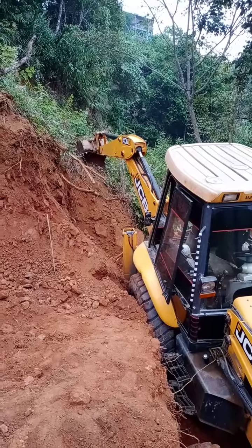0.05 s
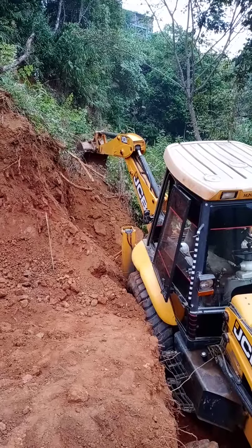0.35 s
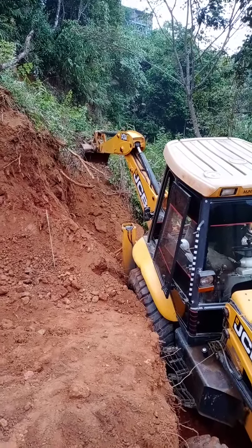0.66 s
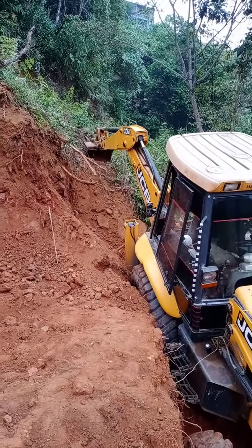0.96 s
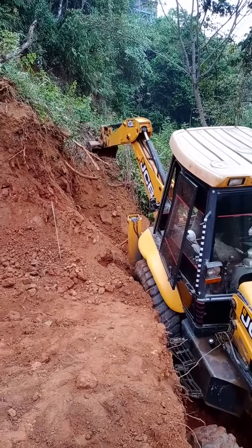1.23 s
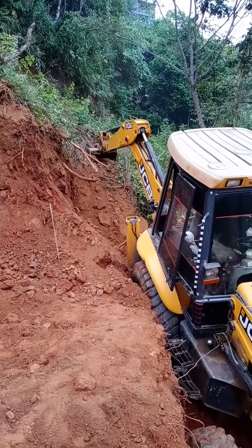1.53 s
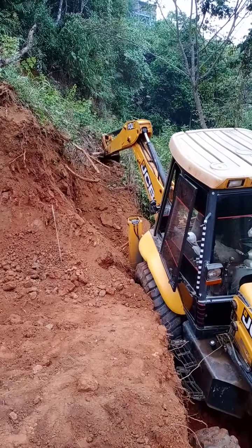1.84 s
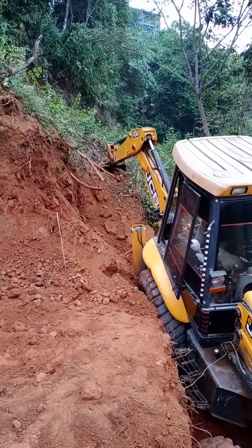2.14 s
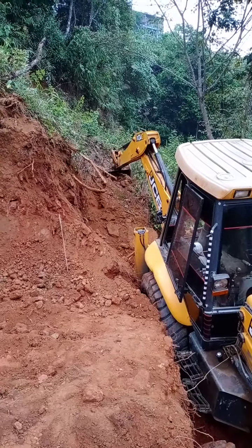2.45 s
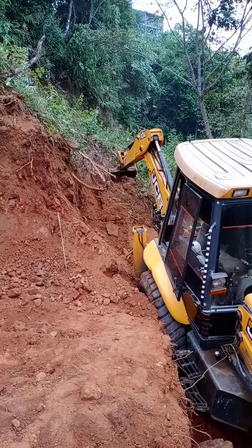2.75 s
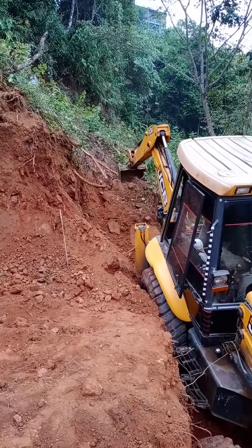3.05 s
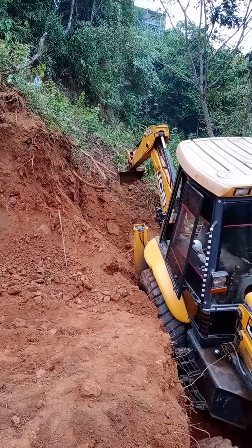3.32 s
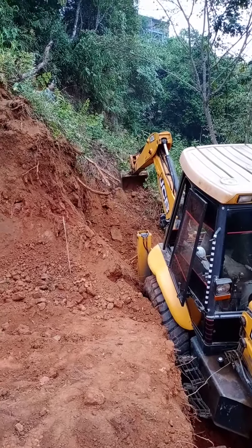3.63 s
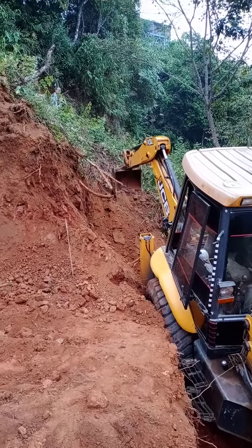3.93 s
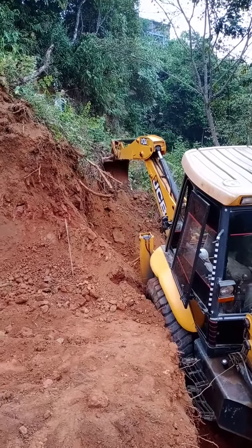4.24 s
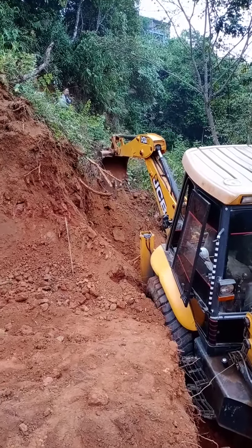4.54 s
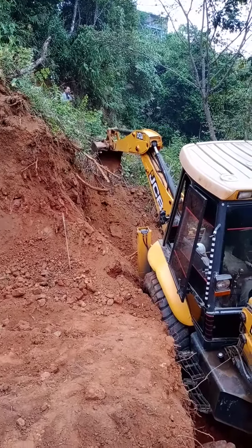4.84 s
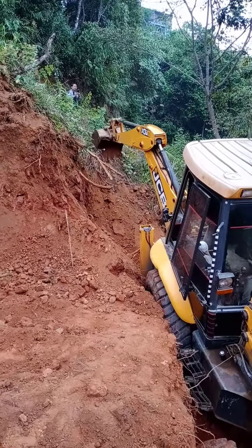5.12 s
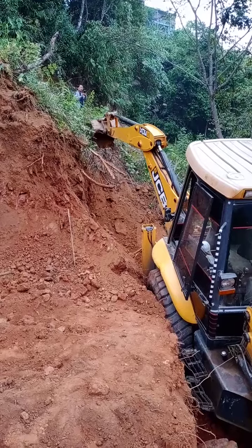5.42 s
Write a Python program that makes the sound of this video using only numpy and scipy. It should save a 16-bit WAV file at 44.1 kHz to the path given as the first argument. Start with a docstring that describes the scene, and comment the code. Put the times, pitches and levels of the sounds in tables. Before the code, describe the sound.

A backhoe loader's diesel engine runs throughout, outdoors, a few metres away and somewhat to the left. It is a steady low drone with hard clatter, ticking valves and a fine high hiss, and it dominates the smaller digging sounds. The arm gives a light metallic click and knock right at the start, then two more knocks around 1.4 to 1.5 seconds with a brief scrape. After another scrape at 2.6 seconds the engine sags as the bucket bites the earth, and the arm groans softly near 2.9. By 3.1 the engine recovers, with a very faint, thin turbo whistle. Four short gritty bucket scrapes follow between 3.4 and 3.8 seconds, ending in one tiny pivot squeak and a light knock. Dull earth thuds and trickling soil are barely audible underneath. The engine carries on, wavering slightly, until about 5.6 seconds.

```python
"""A four-cylinder diesel drones and clatters near 1470 rpm: a backhoe loader digging a few metres away.
Exhaust puffs and fan blades make the drone, combustion knocks the block, valves tick and the treble hisses.
The engine sags as the bucket bites the earth bank; a thin turbo whistle rises just after.
The arm knocks lightly and groans, earth gives way, the bucket scrapes and a dry pivot squeaks once."""
import sys
import numpy as np
from scipy import signal
from scipy.fft import rfft, irfft, next_fast_len
from scipy.io import wavfile
from scipy.ndimage import uniform_filter1d, minimum_filter1d, map_coordinates

SR = 44100
rng = np.random.default_rng(int(sys.argv[2]) if len(sys.argv) > 2 else 0)


def output_pcm(signal):
    """Save a mono or channel-first signal as 16-bit PCM at the path in sys.argv[1].

    Samples are clipped to [-1, 1] before scaling.
    """
    pcm = np.clip(np.atleast_2d(signal).T, -1, 1) * 32767
    wavfile.write(sys.argv[1], SR, np.round(pcm).astype(np.int16))


N = 246078

# engine speed, sagging when the bucket bites: (time [s], firing rate [Hz])
FIRING_RATE_HZ = [(0.0, 49.52), (0.5, 49.23), (0.8, 49.64), (1.25, 48.7), (1.46, 48.06), (1.92, 48.92),
                  (2.24, 48.3), (2.58, 48.35), (2.76, 45.16), (2.91, 44.99), (3.11, 50.35), (3.44, 49.67),
                  (3.62, 48.96), (3.95, 48.46), (4.4, 49.01), (4.6, 49.6), (5.0, 47.69), (5.58, 49.49)]
# cylinder strengths in firing order: (gain [dB])
CYLINDER_DB = [-1.3, -0.19, 1.6, 1.8]
# exhaust and gear tones: (multiple of firing rate [1], level [dB])
ENGINE_ORDERS = [(1, -49), (2, -32.5), (3, -28), (3.75, -36.5), (4, -31), (4.5, -49), (4.75, -56), (5, -36),
                 (5.5, -35.5), (6, -36.5), (7, -39.5), (7.5, -38.5), (8, -44.5), (10.75, -51.5),
                 (15.75, -54), (20.75, -49), (23.25, -48), (29.25, -45)]
# noise spectra: (frequency [Hz], relative density [dB])
EXHAUST_SPECTRUM = [(20, -44), (40, -38), (58, -13.5), (80, -9.5), (125, -0.5), (200, 0.5), (290, 0),
                    (375, -1), (440, -7), (520, -9.5), (620, -28.5), (1000, -45.5)]
BLOCK_SPECTRUM = [(300, -3.5), (520, -8.5), (600, 1.5), (690, -4.5), (780, -3.5), (880, -1), (1050, 0),
                  (1280, 1), (1560, 1), (1750, -8), (2100, -12.5), (3000, -41)]
VALVE_SPECTRUM = [(1200, -13), (1850, -10), (2150, -2.5), (2350, -4), (2650, -0.5), (3050, -6), (3550, -2),
                  (3950, 2), (4350, 0.5), (4700, -7), (5100, -18.5), (6000, -23), (7000, -28), (9000, -52)]
HISS_SPECTRUM = [(3000, -33), (5500, -12), (7000, -14), (8300, -15), (9600, -1), (10200, -1.5), (11000, 6),
                 (11700, 1), (12800, 2.5), (13700, -2.5), (14200, 2), (15000, -14), (16000, 3)]
SOIL_SPECTRUM = [(1500, -29), (2800, 6.5), (4000, 5.5), (5200, -2.5), (6500, -6), (8200, -14), (11000, -6),
                 (12500, -14), (14500, -25)]
# resonances of engine panels and steel bucket: (frequency [Hz], width [Hz], gain [dB])
PANEL_MODES = [(778.5, 52, 2.5), (1009, 45, 3.5), (1111, 22, -1), (1426, 70, -0.5), (2116, 29, -6),
               (2470, 105, -2.5), (4020, 62, -1.5), (5970, 110, 3)]
BUCKET_MODES = [(2780, 200, -0.5), (3430, 260, 0), (4050, 450, 3.5)]
# earth giving way, soil sliding off the bucket, arm straining: (time [s], level [dB], sigma [s])
EARTH_THUDS = [(1.65, -40, 0.065), (3.235, -36, .04)]
SOIL_SPILLS = [(0.22, -45, 0.04), (1.47, -51, 0.07), (2.8, -46, 0.08), (3.4, -50, 0.13), (5.55, -49, 0.08)]
ARM_GROANS = [(2.92, -33.5, 0.11)]
# knocks in the arm's joints: (time [s], level [dB], pitch [Hz], width [Hz], t60 [s])
ARM_KNOCKS = [(0.09, -21.5, 2800, 220, 0.039), (0.091, -26, 2020, 149, 0.064), (.218, -26, 1040, 120, .08),
              (1.352, -21, 1070, 120, .08), (1.516, -18, 1040, 70, 0.059), (2.85, -35.5, 4900, 80, .17),
              (3.826, -26, 990, 70.05, .07)]
# pivot squeak partials: (harmonic [1], level [dB])
SQUEAK_PARTIALS = [(1, -25.5), (2, -47), (3, -41.5)]
# bucket scrapes: (time [s], level [dB], decay [s])
BUCKET_SCRAPES = [(1.497, -31, 0.011), (2.585, -30.5, 0.011), (3.434, -24.5, .014), (3.514, -25.5, .015),
                  (3.677, -24.5, 0.013), (3.756, -24.5, 0.013)]
# stereo balance: (frequency [Hz], left minus right [dB])
BALANCE_DB = [(60, 2.5), (130, 3.5), (380, 4.5), (700, 4.5), (1280, 8), (2300, 4), (4400, 4.5), (5600, 3.5),
              (7000, -1), (9000, -19.5), (10500, -15.5), (12000, -9.5), (15000, 0)]


def amp(db):
    """Decibels to gain."""
    return 10 ** (np.asarray(db) / 20)


def unit(x):
    """Scale to rms 1."""
    return x / np.sqrt(np.mean(x ** 2) + 1e-20)


def time_s():
    """Time of each sample."""
    return np.arange(N) / SR


def along(points, hz):
    """Interpolate (frequency [Hz], value) points on a log axis."""
    knots_hz, values = np.transpose(points)
    return np.interp(np.log(hz + 1), np.log(knots_hz + 1), values)


def wobble(rate_hz):
    """Smooth random curve with knots at rate_hz."""
    return map_coordinates(rng.standard_normal(int(N * rate_hz / SR) + 4), [time_s() * rate_hz])


def lagged(x, lag_s):
    """First-order lag."""
    pole = np.exp(-1 / (lag_s * SR))
    return signal.lfilter([1 - pole], [1, -pole], x)


def swells(rows):
    """Sum of Gaussian envelopes."""
    return sum(amp(db) * np.exp(-.5 * ((time_s() - at_s) / sigma_s) ** 2) for at_s, db, sigma_s in rows)


def filtered(x, response):
    """Apply the gain response(hz)."""
    size = next_fast_len(N + SR // 2)
    return irfft(rfft(x, size) * response(np.fft.rfftfreq(size, 1 / SR)), size)[..., :N]


def coloured(x, spectrum):
    """x shaped by a spectrum, at rms 1."""
    return unit(filtered(x, lambda hz: amp(along(spectrum, hz))))


def ringing(x, modes):
    """x through parallel resonances, at rms 1."""
    def response(hz):
        return sum(amp(db) * 1j * hz * width_hz / (mode_hz ** 2 - hz ** 2 + 1j * hz * width_hz)
                   for mode_hz, width_hz, db in modes)
    return unit(filtered(x, response))


def band(centre_hz, width_hz):
    """Gaussian band of noise, at rms 1."""
    noise = rng.standard_normal(N)
    return unit(filtered(noise, lambda hz: np.exp(-.5 * ((hz - centre_hz) / width_hz) ** 2)))


def bursts(turns, decay_turns, scatter_db, steady):
    """Noise flaring at each whole turn, over a steady part."""
    index = turns.astype(int)
    strength = amp(np.take(CYLINDER_DB, index, mode="wrap") + scatter_db * rng.standard_normal(4096)[index])
    flare = unit(strength * np.exp(-(turns % 1) / decay_turns))
    return rng.standard_normal(N) * np.hypot(flare, steady)


def drone(firings, load, waver_db=0.6, load_db=8):
    """Exhaust and gear tones; the lowest swell when the engine labours."""
    tones = np.zeros(N)
    for order, db in ENGINE_ORDERS:
        swell_db = load_db * load / max(order - 1, 1)
        gain = amp(db + waver_db * wobble(9) + swell_db)
        tones += gain * np.sin(2 * np.pi * (order * firings + rng.random()))
    return np.sqrt(2) * tones


def fan(firings, load, blade_order=5.25, level_db=-26, load_db=-3, waver_db=0.5):
    """The belt-driven fan's blade tone follows the crank and fades as it slows."""
    gain = amp(level_db + load_db * np.maximum(load, 0) + waver_db * wobble(16))
    return np.sqrt(2) * gain * np.sin(2 * np.pi * blade_order * firings)


def exhaust(firings, load, level_db=-23.7, load_db=-1.5):
    """One turbulent puff per firing booms through the silencer, softer as the engine slows."""
    puffs = coloured(bursts(firings, decay_turns=0.58, scatter_db=3, steady=1.2), EXHAUST_SPECTRUM)
    # equal fuel per cycle keeps the power even
    cycle_power = np.abs(uniform_filter1d(puffs ** 2, size=3600))
    return amp(level_db + load_db * load) * puffs / np.sqrt(cycle_power + 1e-6)


def clatter(firings, overspeed_hz, sag_hz, block_db=-30.5, panel_db=-32, valve_db=-30.15,
            sag_db_per_hz=0.7, speed_db_per_hz=0.57, panel_cut_hz=4300):
    """Combustion knocks the block and its panels; valves and injectors tick twice per firing."""
    knocks = bursts(firings, decay_turns=0.26, scatter_db=1, steady=3)
    panels = ringing(bursts(firings, decay_turns=0.38, scatter_db=-3, steady=1.74), PANEL_MODES)
    panels = filtered(panels, lambda hz: 1 / (1 + (hz / panel_cut_hz) ** 8))
    body = amp(block_db) * coloured(knocks, BLOCK_SPECTRUM) + amp(panel_db) * panels
    ticks = bursts(2 * firings, decay_turns=0.47, scatter_db=3, steady=3.2)
    ticks *= amp(0.6 * np.cos(2 * np.pi * firings))
    valves = amp(valve_db + speed_db_per_hz * overspeed_hz) * coloured(ticks, VALVE_SPECTRUM)
    # one uneven throb per four firings
    throb_db = 0.63 * np.cos(np.pi * firings / 2) + 0.67 * wobble(24.075)
    return amp(sag_db_per_hz * sag_hz + throb_db) * body + amp(0.8 * throb_db) * valves


def hiss(firings, overspeed_hz, level_db=-44, speed_db_per_hz=0.3, flutter_db=1, chuff_db=2.2, spit_db=-3):
    """High hiss chuffs and spits with the firings."""
    chuffs = rng.standard_normal(N) * amp(chuff_db * np.cos(2 * np.pi * firings))
    spits = amp(spit_db) * bursts(firings, decay_turns=0.61, scatter_db=5, steady=0.5)
    gain = amp(level_db + speed_db_per_hz * overspeed_hz + flutter_db * wobble(32))
    return gain * coloured(chuffs + spits, HISS_SPECTRUM)


def injector(firings, level_db=-51.5, lead_firings=0.3, decay_firings=0.22):
    """One injector pings faintly once per four firings."""
    age_firings = (firings + lead_firings) % len(CYLINDER_DB)
    return amp(level_db) * np.exp(-age_firings / decay_firings) * band(centre_hz=14200, width_hz=90)


def turbo(overspeed_hz, sag_hz, cruise_pitch_hz=10950, spread_hz=100, level_db=-55.7, waver_db=1.2):
    """A fuzzy whistle climbs with boost (sustained sag) and gas flow (speed), peaking after the load."""
    pitch_hz = cruise_pitch_hz + 500 * sag_hz + 80 * overspeed_hz + spread_hz * wobble(600)
    phase = 2 * np.pi * np.cumsum(pitch_hz) / SR
    gain = amp(level_db + 0.8 * sag_hz + 0.6 * overspeed_hz + waver_db * wobble(3.96))
    breath = 1 + 0.56 * wobble(200)
    return gain * unit(breath * np.sin(phase))


def earth(grain_db=3):
    """The bank gives way in dull thuds; sliding soil hisses."""
    trickle = coloured(rng.standard_normal(N) * amp(grain_db * wobble(500)), HISS_SPECTRUM)
    return swells(EARTH_THUDS) * band(centre_hz=72, width_hz=15) + swells(SOIL_SPILLS) * trickle


def pivot(peak_s=3.794, sigma_s=0.0054, pitch_hz=3215, glide_per_s=0.3):
    """A dry pivot slips once with a tiny rising chirp."""
    age_s = time_s() - peak_s
    phase = 2 * np.pi * pitch_hz * (age_s + glide_per_s * age_s ** 2 / 2)
    tone = sum(amp(db) * np.sin(harmonic * phase) for harmonic, db in SQUEAK_PARTIALS)
    return np.sqrt(2) * np.exp(-.5 * (age_s / sigma_s) ** 2) * tone


def arm():
    """The arm groans under load; play in its pins gives light, quickly damped knocks."""
    sound = swells(ARM_GROANS) * band(centre_hz=1080, width_hz=85)
    for start_s, db, pitch_hz, width_hz, t60_s in ARM_KNOCKS:
        age_s = time_s() - start_s
        sound += band(pitch_hz, width_hz) * (age_s > 0) * amp(db - 60 * np.abs(age_s) / t60_s)
    return sound


def bucket(rise_s=0.0013, ring_decay_s=0.019, ring_db=3, grain_db=3):
    """Short gritty scrapes in the soil, each briefly ringing the steel."""
    grit_envelope, ring_envelope = np.zeros(N), np.zeros(N)
    for start_s, db, decay_s in BUCKET_SCRAPES:
        age_s = np.maximum(time_s() - start_s, 0)
        bite = amp(db) * (1 - np.exp(-age_s / rise_s))
        grit_envelope += bite * np.exp(-age_s / decay_s)
        ring_envelope += bite * np.exp(-age_s / ring_decay_s)
    steel = unit(sum(amp(db) * band(hz, width_hz) for hz, width_hz, db in BUCKET_MODES))
    grit = coloured(rng.standard_normal(N) * amp(grain_db * wobble(900)), SOIL_SPECTRUM)
    return grit_envelope * grit + amp(ring_db) * ring_envelope * steel


def scene(cruise_hz=49.4, spool_s=0.8, fuel_lag_s=0.1):
    """Firing rate drives every engine layer; the machine sits left except in the high treble."""
    rate_hz = np.interp(time_s(), *np.transpose(FIRING_RATE_HZ))
    firings = np.cumsum(rate_hz) / SR
    load = (np.median(rate_hz) - rate_hz) / np.ptp(rate_hz)
    overspeed_hz = rate_hz - cruise_hz
    sag_hz = lagged(-overspeed_hz, spool_s)
    engine = drone(firings, lagged(load, fuel_lag_s)) + fan(firings, load) + exhaust(firings, load)
    engine += clatter(firings, overspeed_hz, sag_hz)
    engine += hiss(firings, overspeed_hz) + turbo(overspeed_hz, sag_hz) + injector(firings)
    digging = bucket() + arm() + earth() + pivot()

    def pan(hz):
        left_share = 1 / (1 + amp(-along(BALANCE_DB, hz)))
        return 2 * np.array([left_share, 1 - left_share])
    return filtered(engine + digging, pan)


def record(dry, ceiling=0.47, low_cut_hz=40, high_cut_hz=15500):
    """Fast peak limiter, then low and high cuts."""
    needed_gain = np.minimum(1, ceiling / (np.abs(dry).max(axis=0) + 1e-9))
    gain = uniform_filter1d(minimum_filter1d(needed_gain, size=800), size=800)
    high_pass = lambda hz: hz ** 4 / np.hypot(hz ** 4, low_cut_hz ** 4)
    return filtered(dry * gain, lambda hz: high_pass(hz) * (hz < high_cut_hz))


dry = scene()
out = record(dry)
output_pcm(out)
```